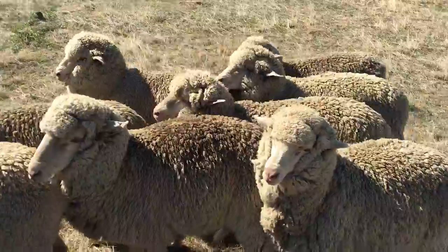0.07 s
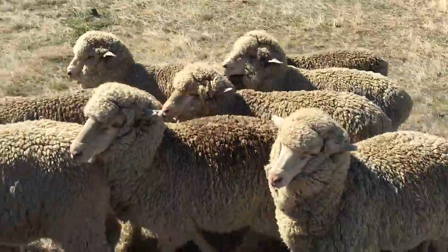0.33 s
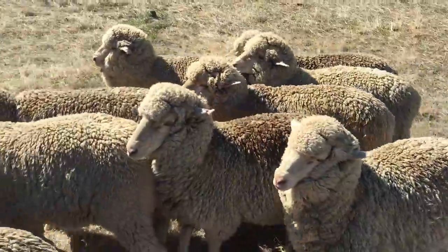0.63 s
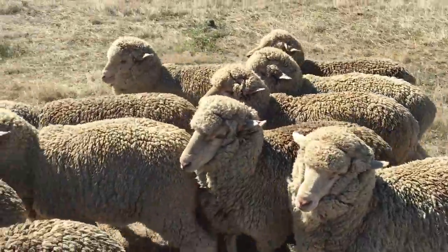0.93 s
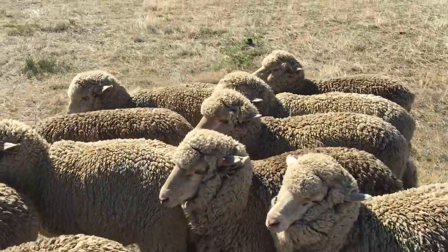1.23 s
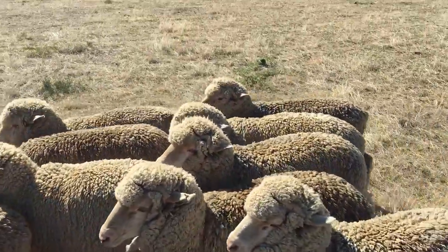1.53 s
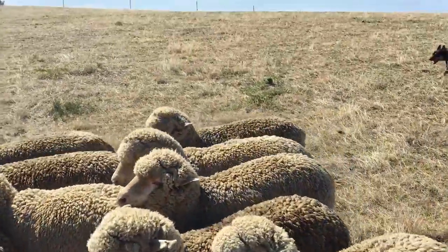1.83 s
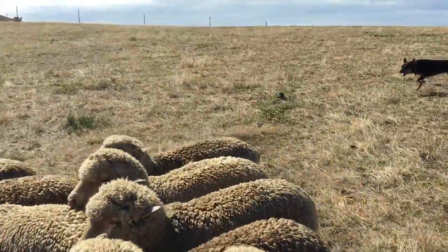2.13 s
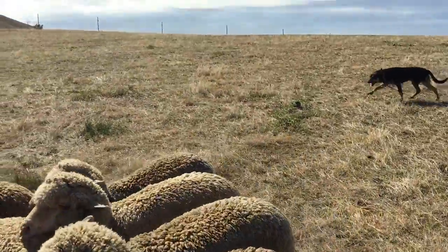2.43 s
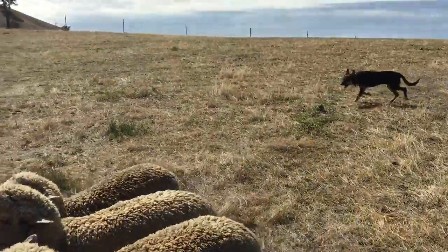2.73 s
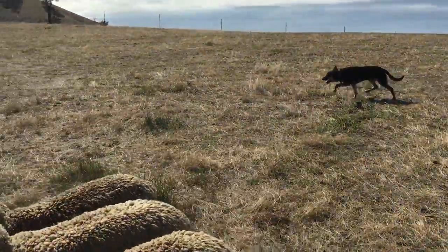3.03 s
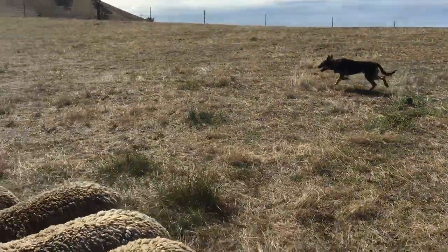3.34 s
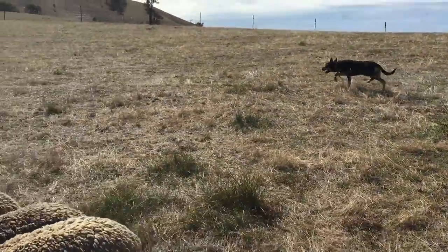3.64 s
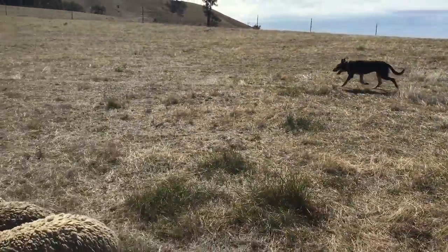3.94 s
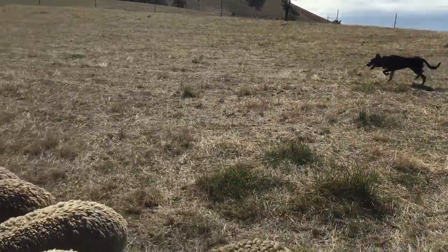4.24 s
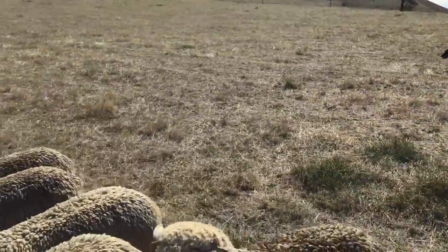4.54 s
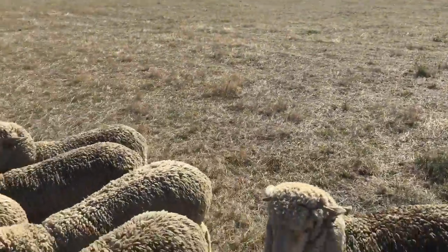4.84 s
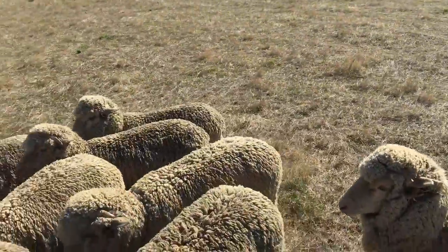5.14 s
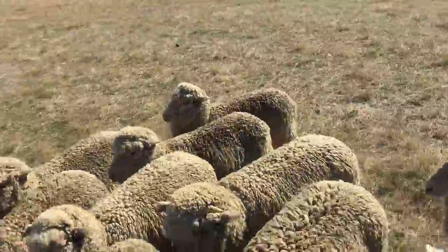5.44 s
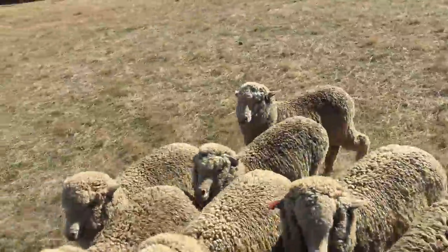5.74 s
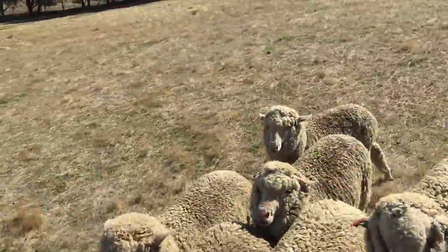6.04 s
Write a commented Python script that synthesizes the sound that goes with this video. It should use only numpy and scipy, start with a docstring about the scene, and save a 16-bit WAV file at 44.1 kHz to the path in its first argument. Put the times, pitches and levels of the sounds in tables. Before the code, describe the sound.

A flock of sheep shuffles quietly over dry grass on an open hillside. Legs swish through straw, hooves tread softly on gritty soil and stalks give tiny snaps, while light puffs of air nudge the microphone. A few dull knocks sound close by, the loudest just before halfway. Near the end a gust builds into a rough, low rumble that covers the rustling.

```python
"""A flock of sheep shuffles over dry grass on an open hillside, in a soft wash of air.
From the start, legs swish through the straw, hooves grind the soil and snap stalks,
and light puffs of wind nudge the microphone. A few dull knocks follow close by, the
loudest at 2.6 s. From about 5 s a gust builds into a rough rumble that lasts to the end."""
import sys
import numpy as np
from scipy import signal
from scipy.fft import rfft, irfft, next_fast_len
from scipy.io import wavfile
from scipy.ndimage import uniform_filter1d

SR = 44100
rng = np.random.default_rng(int(sys.argv[2]) if len(sys.argv) > 2 else 0)


def unload_wav(signal):
    """Save mono or channel-first audio to the path in sys.argv[1] as 16-bit WAV at rate SR, clipped to [-1, 1]."""
    wavfile.write(
        sys.argv[1],
        SR,
        np.round(np.clip(np.atleast_2d(signal).T, -1, 1) * 32767).astype(np.int16),
    )


N = 276948
TIME = np.arange(N) / SR

# the tone of dry straw being rubbed: f/Hz, level/dB
STRAW_TONE = [(150, -30), (600, -13.5), (1100, -7.5), (1800, -4.5), (2900, -6), (3400, -0.5), (4200, -0.5),
              (4850, -4.5), (5700, 0), (6600, 2), (7500, -1), (8800, -.5), (9700, -2), (10400, -9),
              (11200, -4.5), (16000, -11)]
# single puffs of air on the microphone: t/s, level/dB, f/Hz
AIR_PUFFS = [(.062, -33, 61.6), (0.28, -32.5, 82), (.306, -32.5, 91.6), (0.327, -30.5, 70),
             (.399, -34.5, 101), (0.442, -21.8, 73), (.720, -36.5, 100), (.78, -38.5, 73.4),
             (.940, -31, 80.5), (1.090, -37.5, 64.4), (1.360, -30.5, 68.5), (1.871, -38, 60),
             (2.5889, -21, 76), (2.6072, -25.2, 101.1), (2.652, -31.5, 79), (2.717, -31, 84),
             (2.776, -31.5, 100), (3.169, -37.5, 64.4), (3.852, -35, 64.6), (4.217, -34.5, 66),
             (4.414, -34, 72.6), (5.245, -20.5, 214), (5.286, -29, 424), (5.300, -28.5, 397),
             (5.437, -24.5, 107), (5.712, -16.5, 164), (5.728, -16, 204), (5.741, -16, 73),
             (5.892, -24, 283), (6.027, -10, 79), (6.064, -18.5, 189), (6.100, -25, 303), (6.163, -22, 228),
             (6.227, -18.5, 211), (6.261, -16.5, 178)]


def amp(db):
    """Turns decibels into a number to multiply a sound by."""
    return 10 ** (np.asarray(db) / 20)


def unit(x):
    """Scales a signal to an average strength (rms) of one."""
    return x / np.sqrt(np.mean(x ** 2) + 1e-20)


def curve(rows):
    """Joins (time, value) rows by straight lines."""
    return np.interp(TIME, *np.transpose(rows))


def colour(x, tone):
    """Gives a sound the tone in a table of f/Hz, level/dB, at a strength of one."""
    hz, db = np.transpose(tone)
    size = next_fast_len(N, True)
    freqs = np.fft.rfftfreq(size, 1 / SR)
    gain = amp(np.interp(np.log(freqs + 1), np.log(hz), db))
    return unit(irfft(rfft(x, size) * gain, size)[:N])


def treble(x, above_hz=9000):
    """Keeps only the high, crisp part of a sound."""
    return signal.filtfilt(*signal.butter(2, above_hz, "high", fs=SR), x)


def drift(hz, step_s=.001):
    """A smooth random wobble, with up to about hz swings a second."""
    ticks = np.arange(0, TIME[-1] + step_s, step_s)
    freqs = np.fft.rfftfreq(len(ticks), step_s)
    spectrum = rfft(rng.standard_normal(len(ticks))) / (1 + (freqs / hz) ** 4)
    return np.interp(TIME, ticks, unit(irfft(spectrum, len(ticks))))


def add(mix, s, sound):
    """Mixes a sound in, starting at s seconds."""
    start = round(s * SR)
    sound = sound[max(-start, 0):]
    part = mix[max(start, 0):][:len(sound)]
    part += sound[:len(part)]


def swells(rows, rise_s, fade_s):
    """The power of smooth swells, one for each row of t/s, level/dB."""
    power, t = np.zeros(N), TIME[:SR // 2] - TIME[SR // 4]
    shape = np.exp(-(t / np.where(t < 0, rise_s, fade_s)) ** 2)
    for s, db, *_ in rows:
        add(power, s + t[0], amp(db) ** 2 * shape)
    return power


def crackle(per_s, spread_db, hiss):
    """Tiny cracks of uneven size over the hiss of countless smaller ones."""
    sizes = amp(spread_db * np.minimum(rng.exponential(1, N), 4))
    clicks = sizes * rng.choice([-1, 1], N) * (rng.random(N) < per_s / SR)
    return unit(clicks) + hiss * rng.standard_normal(N)


def air(level_db=-63, waver_db=1.85):
    """A soft, wavering wash from the open slope."""
    # the tone of the open air: f/Hz, level/dB
    air_tone = [(20, -22), (60, 0), (130, -5.5), (290, -5), (440, -14), (680, -13), (850, -19.5),
                (1600, -19), (2800, -28.5), (6500, -19), (11000, -25), (16000, -27.5)]
    return colour(rng.standard_normal(N), air_tone) * amp(level_db + waver_db * drift(hz=7))


def wind_pressure_db(wake_db=-17):
    """How hard the wind pushes: breeze, gust and the churning air behind each puff."""
    # the light breeze: t/s, level/dB
    breeze = [(0, -51.5), (.55, -54.5), (1.6, -52), (2.2, -54.5), (4.2, -49), (4.8, -51)]
    # the gust, arriving in three surges: t/s, level/dB
    gust = [(4.6, -65), (4.97, -45), (5.12, -29.5), (5.27, -28), (5.4, -36), (5.53, -31), (5.6, -27),
            (5.9, -31), (5.98, -23), (6.28, -25)]
    wakes = amp(wake_db) ** 2 * swells(AIR_PUFFS, rise_s=.013, fade_s=.037)
    return 10 * np.log10(amp(curve(breeze)) ** 2 + amp(curve(gust)) ** 2 + wakes)


def wind(full_gust_db=-23, lumpy_db=2.2, burst_db=4, burst_hz=400):
    """Swirling air rumbles: faster air sheds smaller swirls, and the smallest come in bursts."""
    # the bands of a full gust: f/Hz, level/dB, extra growth/(dB per dB of pressure)
    swirls = [(18, -40, -1), (29.8, -20, 4), (44.6, -3, -0.36), (70.6, 1.5, -0.06), (99, .5, 0.2),
              (142.4, -2, 0.19), (223, -8.5, 0.36), (352, -23, 0.06), (496, -26.5, 0.5), (698, -36, 0.55),
              (1130, -46.5, 1.4), (2000, -65, -0.4), (4030, -94, -1.8)]
    hz, db, growth = np.transpose(swirls)
    size = next_fast_len(N, True)
    log_freqs = np.log(np.fft.rfftfreq(size, 1 / SR) + 1)
    spectrum = rfft(rng.standard_normal(size)) * amp(np.interp(log_freqs, np.log(hz), db))
    pressure_db = wind_pressure_db()
    bursts = np.tanh(drift(hz=67) / 2) * 2
    out = np.zeros(N)
    for centre, extra, share in zip(hz, growth, np.eye(len(hz))):
        band = irfft(spectrum * np.interp(log_freqs, np.log(hz), share), size)[:N]
        flicker_db = burst_db * min(centre / burst_hz, 1.5) * bursts
        out += band * amp(extra * (pressure_db - full_gust_db) + flicker_db)
    # even out the level, so that the mix of swirls changes only the tone
    out /= np.sqrt(uniform_filter1d(out ** 2, size=4096) + 1e-12)
    return out * amp(pressure_db + lumpy_db * drift(hz=26.6))


def puffs(gain_db=-.5, swell_cycles=.59, slowing=.94, slowing_s=.0036):
    """One swirl of air passes: the pressure swings two or three times, quickly at first."""
    out, t = np.zeros(N), TIME[:5000]
    for s, db, hz in AIR_PUFFS:
        lead_s = slowing * slowing_s * (1 - np.exp(-t / slowing_s)) * min(100 / hz, 1) ** 2
        turns = hz * (t + lead_s)
        age = turns / swell_cycles
        puff = age ** 2 * np.exp(-1.5 * age) * np.sin(2 * np.pi * turns)
        add(out, s, -amp(db + gain_db) * puff / abs(puff).max())
    return out


def scuffing(flutter_db=2.5):
    """Under the straw the hooves grind dry soil: a dull, gritty sound."""
    # the tone of that soil: f/Hz, level/dB
    soil_tone = [(40, -28), (130, 3), (290, 5), (440, 0), (680, -1), (850, -7), (1300, -3.5), (2200, -5.5),
                 (2900, -10.5), (5000, -19.5), (16000, -52)]
    # the flock treading as it draws nearer: t/s, level/dB
    treading = [(0, -66.5), (.7, -66.5), (.9, -72), (1.3, -64), (1.55, -68.5), (2.15, -70), (3.0, -67.5),
                (3.45, -64), (4.5, -63.5), (5.1, -61.5), (6.28, -62.5)]
    grit = colour(crackle(per_s=150, spread_db=3, hiss=1.8), soil_tone)
    return grit * amp(curve(treading) + flutter_db * drift(hz=29))


def shuffling(flutter_db=2.1, crisping=.15, usual_db=-61):
    """Many hooves in the straw merge into one restless rustle, crisper when they are busy."""
    # how busily the whole flock shuffles: t/s, level/dB
    bustle = [(0, -59.5), (.78, -62.5), (.9, -63), (1.25, -69), (1.58, -67.5), (1.95, -61.5), (2.17, -66),
              (2.5, -61), (2.75, -63.5), (2.95, -61), (3.45, -64), (4.25, -65), (5.3, -61), (6.28, -63.5)]
    rustle = colour(crackle(per_s=350, spread_db=4, hiss=1.62), STRAW_TONE)
    effort_db = curve(bustle) + flutter_db * drift(hz=31)
    crisp_db = crisping * (effort_db - usual_db)
    return (rustle + treble(rustle) * (amp(crisp_db) - 1)) * amp(effort_db)


def steps(gain_db=-1):
    """A near hoof takes the animal's weight and crushes the soil with a soft thud."""
    # hooves set down on bare soil: t/s, level/dB
    footfalls = [(.08, -62), (.38, -62), (.74, -55.5), (1.03, -58.5), (1.22, -60.5), (1.36, -60.5),
                 (1.77, -62.5), (2.44, -62.5), (3.07, -60), (3.25, -59), (3.44, -57.5), (3.66, -64),
                 (3.87, -60), (4.07, -58), (4.23, -58.5), (4.39, -60), (4.76, -64)]
    # the tone of a dull tread: f/Hz, level/dB
    thud_tone = [(60, -17), (150, -0.5), (280, 1), (440, -5.5), (680, -6), (900, -14), (1400, -15.5),
                 (2500, -25), (6000, -50)]
    crush = colour(crackle(per_s=200, spread_db=3, hiss=1), thud_tone)
    weight = np.sqrt(swells(footfalls, rise_s=.033, fade_s=.038))
    return crush * weight * amp(gain_db)


def knocks(scuff=.036, scuff_s=.0068, contact_s=.00053):
    """A blunt blow, likely a hoof on hard ground: a push and a scuff set off short, low tones."""
    # the blows: t/s, level/dB, hardness/(dB per octave)
    blows = [(1.613, -50, 4), (2.5817, -26.5, -0.5), (3.255, -45.5, -0.5), (4.922, -37.5, 0.5)]
    # the tones a knock rings with: f/Hz, level/dB, time to fade by 60 dB/s
    tones = [(190, -8, 0.032), (408, -1, 0.019), (550, -5, 0.018), (1030, -1, 0.008), (1350, -4, 0.016),
             (1980, -13, 0.0066)]
    out, t = np.zeros(N), TIME[:4096]
    for s, db, hardness in blows:
        body = np.zeros(len(t))
        for k, (hz, tone_db, ring_s) in enumerate(tones):
            fade = amp(tone_db + hardness * np.log2(hz) - 60 * t / ring_s)
            body += (-1) ** k * fade * np.sin(2 * np.pi * hz * t)
        body *= 1 - np.exp(-t / contact_s)
        grit = scuff * rng.standard_normal(len(t)) * np.exp(-t / scuff_s)
        knock = body + signal.fftconvolve(grit, body)[:len(t)]
        add(out, s, amp(db) * knock / abs(knock).max())
    return out


def snaps(gain_db=-1.4, tear_cycles=3.9, fibres=.26, splinter=.14):
    """A stalk breaks and its fibres tear after it; thick stalks sound lower and ring for longer."""
    # stalks that snap: t/s, level/dB, f/Hz
    stalks = [(0.1276, -35, 7030), (0.224, -36, 5000), (0.3985, -33, 6170), (0.6793, -35, 6000),
              (0.686, -37, 3640), (0.838, -39, 4100), (1.052, -33.5, 4040), (1.736, -33, 4530),
              (1.9592, -37, 6500), (2.2837, -37.5, 5060), (2.6334, -38, 6740), (2.9472, -38, 6100),
              (3.038, -33.5, 6350), (3.3112, -34, 7100), (3.4174, -35, 7120), (3.506, -36, 6350),
              (4.0545, -37, 6330), (4.3291, -38, 5960), (4.5624, -35, 6700), (4.9731, -35, 6160),
              (5.0684, -35.5, 5820), (5.214, -32, 6800), (5.4518, -21.5, 5600)]
    out, t = np.zeros(N), TIME[:512]
    freqs = np.fft.rfftfreq(len(t), 1 / SR) + 1
    low_cut = signal.butter(4, 3000, "high", fs=SR, output="sos")
    for s, db, hz in stalks:
        tear = fibres * rng.standard_normal(len(t)) * np.exp(-t * hz / tear_cycles)
        tear[0] = 1  # the break itself
        width_octaves = .59 * hz / 6000
        stalk_tone = splinter + np.exp(-.5 * (np.log2(freqs / hz) / width_octaves) ** 2)
        snap = signal.sosfilt(low_cut, irfft(rfft(np.roll(tear, 32)) * stalk_tone))
        add(out, s, amp(db + gain_db) * snap / abs(snap).max())
    return out


def swishes(gain_db=.8, edge_s=.0081, drag_db=-9.5, drag_s=.077, flutter_db=2.15, crisp_db=.5):
    """A near leg sweeps through the straw: a crisp run of tiny cracks inside a softer drag."""
    # legs brushing through straw: t/s, length/s, level/dB
    strokes = [(0.002,0.02,-62.8), (0.11,0.085,-59.5), (0.252,0.025,-63.5), (0.324,0.041,-56.5),
               (0.382,0.027,-55), (0.518,0.18,-63.5), (0.719,0.076,-64), (1.155,0.055,-63.5),
               (1.246,0.061,-58), (1.425,0.058,-63.5), (1.639,0.11,-63), (1.764,0.076,-60),
               (1.873,0.21,-66.5), (2.089,0.024,-56), (2.225,0.12,-63.8), (2.448,0.07,-63.5),
               (2.579,0.028,-57.5), (2.834,0.089,-59.5), (3.06,0.035,-60.5), (3.175,0.09,-62),
               (3.287,0.089,-59.5), (3.4,0.022,-55.5), (3.479,0.031,-56.5), (3.62,0.095,-60.5),
               (3.714,0.159,-64), (3.961,0.12,-66), (4.136,0.048,-61), (4.312,0.046,-62.5),
               (4.397,0.041,-59), (4.544,0.026,-60.5), (4.65,0.11,-61), (4.787,0.066,-63.4),
               (5.063,0.12,-63), (5.241,0.15,-67.5), (5.74,0.065,-63.5), (5.845,0.05,-62.5),
               (5.918,0.045,-61.5)]
    power, t = np.zeros(N), TIME[:SR // 2] - TIME[SR // 4]
    # stalks bend ahead of a leg and spring back behind it
    drag = amp(drag_db) * np.exp(-.5 * (t / drag_s) ** 2)
    for s, length, db in strokes:
        sweep = (np.tanh((t + length / 2) / edge_s) - np.tanh((t - length / 2) / edge_s)) / 2
        add(power, s + length / 2 + t[0], (amp(db) * (sweep + drag)) ** 2)
    straw = colour(crackle(per_s=1800, spread_db=3.6, hiss=1.3), STRAW_TONE)
    straw += treble(straw) * (amp(crisp_db) - 1)
    return straw * np.sqrt(power) * amp(gain_db + flutter_db * drift(hz=49))


def scene():
    """Flock and wind in one channel, with no walls to echo them."""
    flock = shuffling() + scuffing() + steps() + swishes() + snaps() + knocks()
    return (flock + puffs() + wind() + air())[None]


def record(dry, low_cut_hz=30, high_cut_hz=15900, fade_s=.006):
    """The microphone loses the deepest bass and highest treble; the sound ends in a quick fade."""
    lean = signal.sosfilt(signal.butter(3, low_cut_hz, "high", fs=SR, output="sos"), dry)
    fade = np.sin(np.pi / 2 * np.minimum((TIME[-1] - TIME) / fade_s, 1)) ** 2
    high_cut = signal.firwin(511, high_cut_hz, window=("kaiser", 9), fs=SR)
    return signal.oaconvolve(lean * fade, high_cut[None], "same")


dry = scene()
out = record(dry)
unload_wav(out)
```